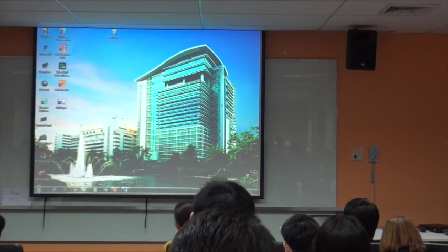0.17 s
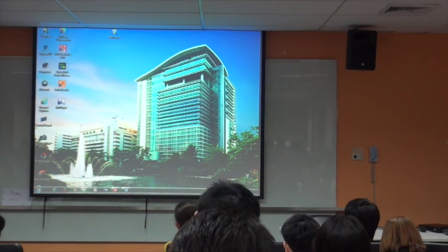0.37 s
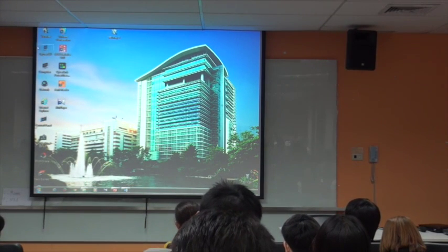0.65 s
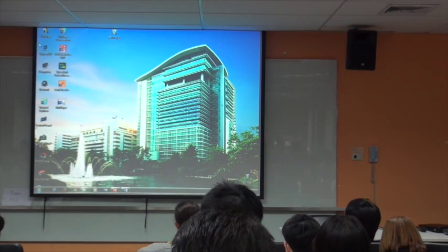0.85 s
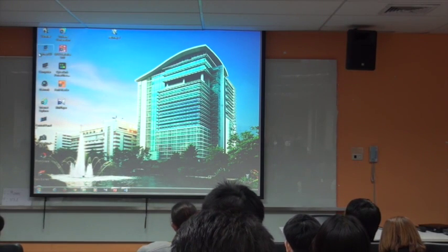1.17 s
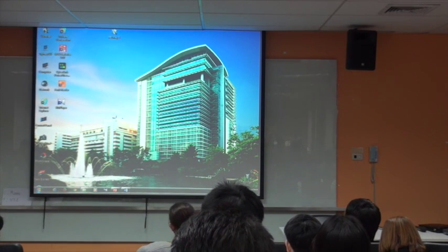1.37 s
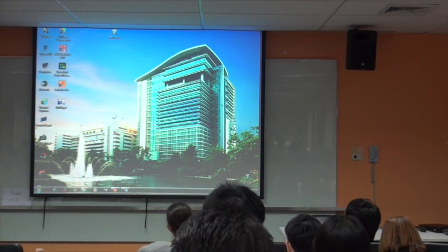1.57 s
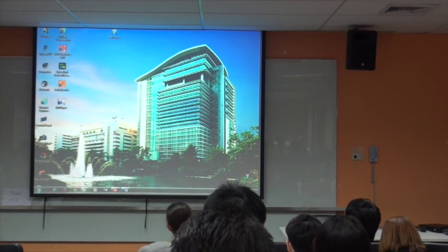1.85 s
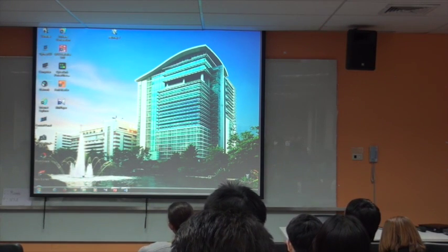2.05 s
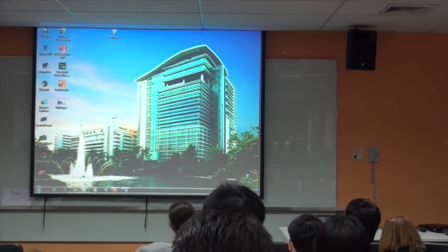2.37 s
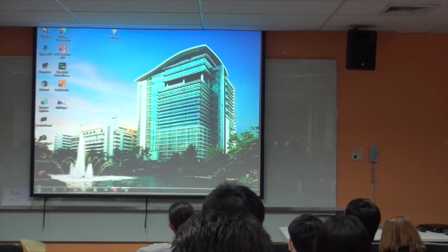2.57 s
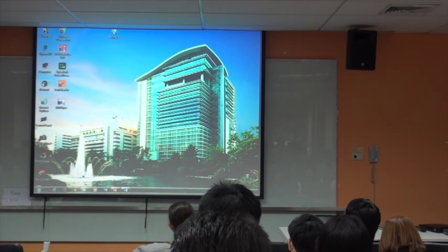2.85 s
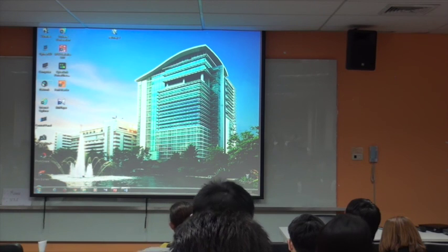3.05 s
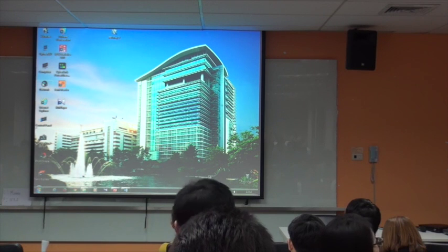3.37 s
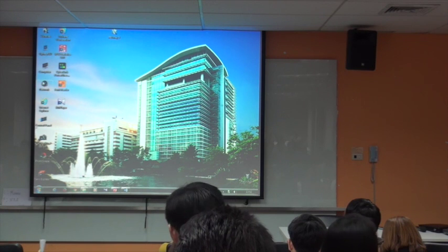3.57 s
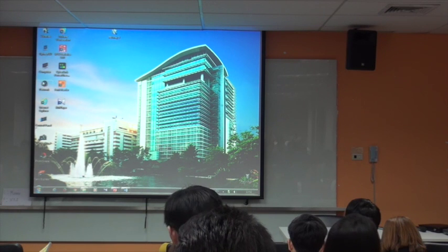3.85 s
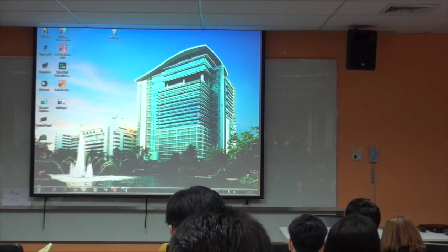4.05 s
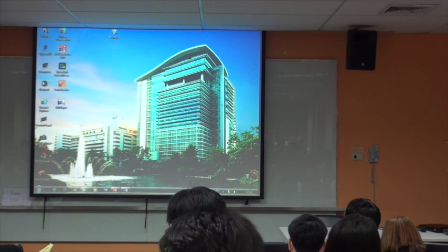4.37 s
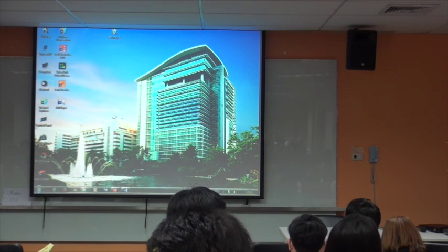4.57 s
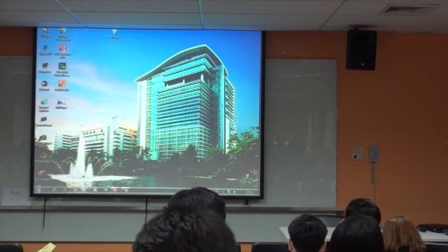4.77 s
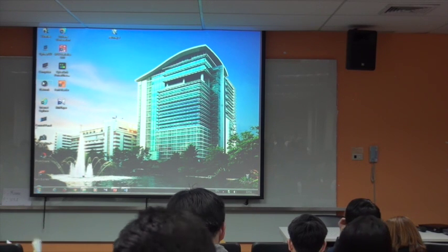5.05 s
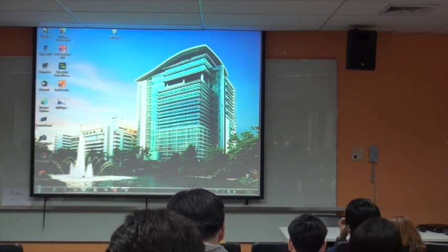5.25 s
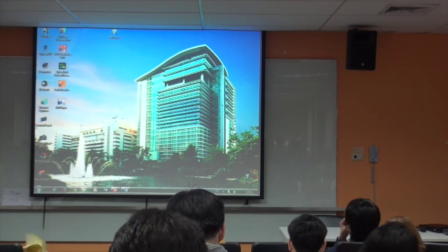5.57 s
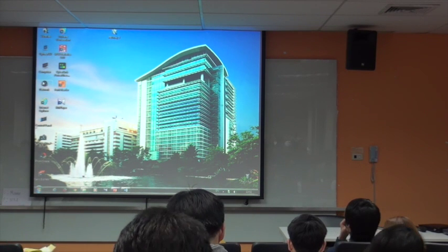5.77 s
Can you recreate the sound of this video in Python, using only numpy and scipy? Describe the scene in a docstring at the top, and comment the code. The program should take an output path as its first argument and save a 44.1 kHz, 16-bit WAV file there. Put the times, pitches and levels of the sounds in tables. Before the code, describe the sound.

A harsh low mains hum with a raspy buzz and fine hiss grows steadily louder in a lecture room, with a few small clicks.

```python
"""Mains hum and buzz: a load that switches on every half cycle induces voltage surges in an idle sound system's line.
Each switching rings the line and spits a thin sizzle; the amplifier adds shaped random hiss, and a comb of sines wavers.
The open microphone adds ventilation rumble, clicks made of damped modes, a scrape of sliding resonance and a rustle.
The whole signal, nearly mono, creeps steadily up in level, a little more slowly as it goes."""
import sys
import numpy as np
from scipy import signal
from scipy.fft import rfft, irfft
from scipy.io import wavfile
from scipy.ndimage import uniform_filter1d

SR = 44100
rng = np.random.default_rng(int(sys.argv[2]) if len(sys.argv) > 2 else 0)


def transcribe(u):
    """Save the signal u as a 16-bit wav file named by the first command-line argument.

    u: samples, shape (n,) or (channels, n), limited to [-1, 1]; the rate is SR.
    q: integer samples, one column per channel.
    """
    v = np.clip(np.atleast_2d(u).T, -1, 1)
    q = np.round(v * 32767).astype(np.int16)
    wavfile.write(sys.argv[1], SR, q)


N = 260693
TIME = np.arange(N) / SR

# All source levels are relative to the rising volume.
# Low harmonics of the hum: [multiple of the mains, rms level/dB]
HUM_HARMONICS = [(1, -2.5), (2, -26.9), (3, -6), (4, -27.5), (5, -12.5), (6, -30.5), (7, -19.5), (8, -39.5),
                 (9, -18), (10, -42), (11, -23.9), (12, -59), (13, -21), (14, -51), (15, -28), (16, -45.1),
                 (17, -24), (18, -47.5), (19, -27), (20, -41), (21, -29), (22, -48), (23, -27.5), (24, -46),
                 (25, -30), (26, -61)]
# Amplifier hiss: [f/Hz, level/dB per Hz]
HISS_SPECTRUM = [(20, -74), (1000, -63.5), (3000, -63), (5000, -63), (8000, -63.5), (16000, -64)]
# Lines of the faint whine, about twice the mains frequency apart: [f/Hz, level/dB before the common whine level]
WHINE_LINES = [(623, -36), (723, -36), (823, -33.5), (923, -51), (1023, -46), (1123, -40.5), (1223, -37)]
# Ventilation rumble at the microphone: [f/Hz, level/dB per Hz before its slight swelling]
RUMBLE_SPECTRUM = [(15, -53), (40, -50), (62, -47), (85, -48.5), (115, -50), (129, -36.5), (175, -52.5),
                   (230, -48.5), (300, -55), (400, -52), (550, -60), (750, -59.5), (1500, -65.5),
                   (4000, -73.5)]
# Noise of opposite sign on left and right: [f/Hz, level/dB per Hz]
SIDE_SPECTRUM = [(80, -108), (160, -77), (400, -65), (700, -70.5), (1200, -125.5), (3000, -126.5),
                 (6000, -94.5), (9000, -88), (13000, -115)]
# Contacts, each favouring the modes around one pitch:
# [t/s, level/dB, favoured f/Hz, spread/octaves, factor on the ring times]
CONTACTS = [ (2.7906, 4.5, 7000, .45, 0.68), (2.88, -5, 5500, .35, 1), (2.8988, 3, 2830, 0.39, 1.3),
            (2.9066, 2, 5500, .35, .8), (2.915, -0.5, 1200, 1.2, 1.5), (3.259, -8, 1400, 1.5, 3.5),
            (4.7625, 10, 11300, .35, 0.71), (4.8595, 14, 4000, 2.4, 1), (4.8920, -7, 2900, .35, 1),
            (4.898, 1.5, 1950, .4, 1), (4.9348, 3, 6400, .18, 1.1), ]
# Modes of the small hard thing that clicks near the microphone:
# [f/Hz, relative level/dB, t60/s before the contact's factor]
CLICK_MODES = [(1180, -7, 0.011), (1820, -9.5, 0.0094), (2890, -8, 0.0067), (3960, -1, .0035),
               (4600, 1, 0.0051), (5820, -6.5, 0.0045), (9300, -6.5, 0.0035), (11400, -8, 0.0032)]
# Colour of the rustling cloth: [f/Hz, relative level/dB per Hz]
RUSTLE_SPECTRUM = [(300, -25), (900, -7), (1700, 4), (2800, -9), (4400, -5), (7000, -22), (16000, -35)]

MAINS_HZ, FIRST_SWITCH_S = 49.9762, .0012
TOP_HZ = 15800  # upper limit of the buzz and of the recorded band
START_DB, RISE_DB_PER_S, EASE_DB_PER_S2 = -27, 1.7853, 0.0323
SCRAPE_S, SCRAPE_LENGTH_S, SCRAPE_DB, SCRAPE_FADE_DB_PER_S = 4.859, .074, -21, 25
SCRAPE_START_HZ, SCRAPE_END_HZ, SCRAPE_SLOWING_S = 4980, 3610, .025
RUSTLE_S, RUSTLE_LENGTH_S, RUSTLE_DB = 5.0, 0.29, -24.5


def undb(db):
    """Logarithmic level: decibels to amplitude gain."""
    return 10 ** (np.asarray(db) / 20)


def unit(x):
    """Normalisation to an rms of 1."""
    return x / np.sqrt(np.mean(x ** 2))


def noise(points):
    """Spectral shaping: white noise weighted by density, from (f/Hz, level/dB per Hz) points on a log axis."""
    hz, db = np.transpose(points)
    bins = np.maximum(np.fft.rfftfreq(N, 1 / SR), 1)
    gain = undb(np.interp(np.log(bins), np.log(hz), db))
    white = rng.standard_normal(N)
    return irfft(rfft(white) * gain, N) * np.sqrt(SR / 2)


def band(hz, width_hz):
    """Resonance: noise of rms 1 concentrated around one frequency, with steep sides."""
    detune = 2 * (np.fft.rfftfreq(N, 1 / SR) - hz) / width_hz
    white = rng.standard_normal(N)
    return unit(irfft(rfft(white) / (1 + detune ** 2), N))


def walk(rate_hz):
    """Slow random fluctuation: held random steps, smoothed twice, to an rms of 1."""
    hold = int(SR / rate_hz)
    steps = np.repeat(rng.standard_normal(N // hold + 1), hold)[:N]
    return unit(uniform_filter1d(uniform_filter1d(steps, hold), hold))


def ring(age, hz, t60):
    """Damped oscillation: a sine that decays by 60 dB in t60 seconds."""
    return np.sin(2 * np.pi * hz * age) * np.exp(-np.log(1000) * age / t60)


def swell(start_s, length_s, attack_s, release_s):
    """Envelope: linear attack, hold to the end of the length, exponential decay."""
    age = TIME - start_s
    attack = np.clip(age / attack_s, 0, 1)
    return attack * np.exp(-np.maximum(age - length_s, 0) / release_s)


def half_cycle(turn, notch, notch_turns, tail_turns, swing=2.06):
    """Induction by one current surge: a jump at switch-on, a swing, a notch at switch-off, a dying tail."""
    swing_turns, conduct_turns = .238, .267  # in mains cycles
    since_off = np.abs(turn - conduct_turns)
    conducting = -swing * np.cos(np.pi * turn / swing_turns) - notch * np.exp(-since_off / notch_turns)
    return np.where(turn < conduct_turns, conducting, np.exp(-since_off / tail_turns))


def switch_ring(turn, long_db, short_db):
    """Step excitation of resonances: the jump sets the line ringing at two high pitches."""
    age = np.abs(turn) / MAINS_HZ
    long_ring = undb(long_db) * ring(age, hz=11550, t60=0.0095)
    short_ring = undb(short_db) * ring(age, hz=13100, t60=0.0022)
    return long_ring + short_ring


def hum(phase, lag_turns=0.00077, soften_hz=12000, buzz_db=0.27, size=8192):
    """Fourier series of two opposite surges a cycle; their inequality leaves weak even harmonics."""
    turn = np.arange(size) / size
    late = turn - .5 - lag_turns
    rising = half_cycle(turn, notch=1.51, notch_turns=0.01756, tail_turns=0.172)
    rising = rising + switch_ring(turn, long_db=-9, short_db=-18)
    falling = -half_cycle(late, notch=1.66, notch_turns=0.0258, tail_turns=0.173)
    falling = falling + switch_ring(late, long_db=-17, short_db=-12.0)
    lines = rfft(np.where(late < 0, rising, falling))[:int(TOP_HZ / MAINS_HZ)]
    # the edges take some microseconds, which softens the top
    lines = lines * undb(buzz_db) / np.hypot(1, np.arange(len(lines)) * MAINS_HZ / soften_hz)
    # the line blocks DC and sets the magnitudes, but not the phases, of the low harmonics
    low = undb([db for _, db in HUM_HARMONICS]) * size / np.sqrt(2)
    lines[0] = 0
    lines[1:len(low) + 1] = low * np.exp(1j * np.angle(lines[1:len(low) + 1]))
    cycle = irfft(lines, size)
    return np.interp(phase, turn, cycle, period=1)


def sizzle(phase):
    """Gated noise: each switching spits a fresh burst of high noise; the two polarities differ."""
    age = phase % .5 / MAINS_HZ  # seconds since the last switching
    first = phase < .5
    onset = 1 - np.exp(-age / 0.00015)
    whistle = band(hz=11680, width_hz=900) * onset * np.exp(-age / 0.0016) * undb(np.where(first, -16, -19))
    spit = band(hz=13800, width_hz=4500) * np.exp(-age / 0.00054) * undb(np.where(first, -16, -12))
    fizz = band(hz=13700, width_hz=4900) * np.exp(-age / 0.0072) * undb(-23.5)
    return whistle + spit + fizz


def hiss():
    """Random noise of the amplifier, steady and nearly flat over the upper band."""
    return noise(HISS_SPECTRUM)


def whine(waver=0.97, whine_db=-4.0):
    """Amplitude modulation: a weak comb of sines swells and fades as one."""
    tones = np.zeros(N)
    for hz, db in WHINE_LINES:
        tones += undb(db) * np.sin(2 * np.pi * (hz * TIME + rng.random()))
    wavering = 1 + waver * np.tanh(walk(6.5))
    return np.sqrt(2) * undb(whine_db) * tones * wavering


def room(swell_db=0.1):
    """Broadband and narrowband noise: ventilation rumble with a narrow fan drone."""
    rumble = noise(RUMBLE_SPECTRUM) * undb(swell_db * walk(4.95))
    drone = undb(-36.0) * band(hz=158.4, width_hz=3.0)
    return rumble + drone


def side_noise():
    """Decorrelation: faint noise to be added on the left and subtracted on the right."""
    return noise(SIDE_SPECTRUM)


def clicks(microphone_hz=12500, crack_db=-13, crack_s=0.00081):
    """Modal excitation: a brief crack and short modes weighted by the contact; the microphone rounds off the top."""
    out = np.zeros(N)
    age = TIME[:SR // 10]
    mode_hz, mode_db, _ = np.transpose(CLICK_MODES)
    for s, db, favoured_hz, spread, ring_factor in CONTACTS:
        crack = undb(crack_db) * rng.standard_normal(len(age)) * np.exp(-age / crack_s)
        # neighbouring modes swing in opposite directions
        rings = np.array([(-1) ** k * ring(age, hz, t60 * ring_factor)
                          for k, (hz, _, t60) in enumerate(CLICK_MODES)])
        octaves_off = np.log2(mode_hz / favoured_hz)
        weights = undb(mode_db) * np.exp(-.5 * (octaves_off / spread) ** 2)
        body = weights @ rings / np.linalg.norm(weights)
        start = int(s * SR)
        out[start:start + len(age)] += undb(db) * (crack + body)
    rounding = signal.butter(N=6, Wn=microphone_hz, fs=SR, output="sos")
    return signal.sosfilt(rounding, out)


def scrape(width_hz=1700, grain_db=3):
    """Friction: grainy noise in a resonance that sinks and fades as the slide slows, trailing the loudest click."""
    age = np.maximum(TIME - SCRAPE_S, 0)
    hz = SCRAPE_END_HZ + (SCRAPE_START_HZ - SCRAPE_END_HZ) * np.exp(-age / SCRAPE_SLOWING_S)
    slide = np.cos(2 * np.pi * np.cumsum(hz) / SR)
    # low noise times the sliding carrier gives a sliding band
    friction = unit(band(0, width_hz) * slide * undb(grain_db * walk(600)))
    fade = undb(SCRAPE_DB - SCRAPE_FADE_DB_PER_S * age)
    return friction * swell(SCRAPE_S, SCRAPE_LENGTH_S, attack_s=.003, release_s=.007) * fade


def rustle(grain_db=2.0):
    """Friction of cloth: one soft, slightly grainy swell of coloured noise as a listener shifts."""
    rubbing = unit(noise(RUSTLE_SPECTRUM) * undb(grain_db * walk(400)))
    return undb(RUSTLE_DB) * rubbing * swell(RUSTLE_S, RUSTLE_LENGTH_S, attack_s=.15, release_s=0.076)


def volume():
    """Gain of the whole line: a steady rise in decibels that eases slightly."""
    return undb(START_DB + RISE_DB_PER_S * TIME - EASE_DB_PER_S2 * TIME ** 2)


def scene():
    """Superposition: all sources share one line and one volume; only a trace of noise differs between the sides."""
    phase = (TIME - FIRST_SWITCH_S) * MAINS_HZ % 1  # mains cycle, 0 to 1
    electrical = hum(phase) + sizzle(phase) + hiss() + whine()
    acoustic = room() + clicks() + scrape() + rustle()
    line = electrical + acoustic
    side = side_noise()
    return np.array([line + side, line - side]) * volume()


def record(dry):
    """Band limiting: the left input is a hair weaker than the right, and the top is cut steeply."""
    inputs = dry * undb([[-.04], [.04]])
    lowpass = signal.ellip(12, .1, 80, TOP_HZ, fs=SR, output="sos")
    return signal.sosfilt(lowpass, inputs)


dry = scene()
out = record(dry)
transcribe(out)
```